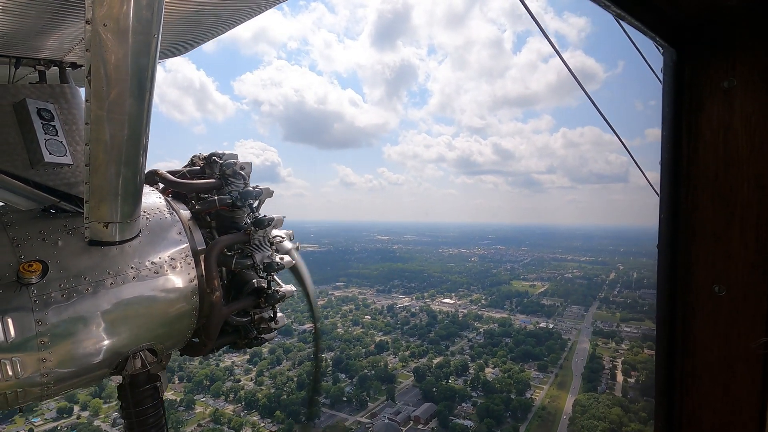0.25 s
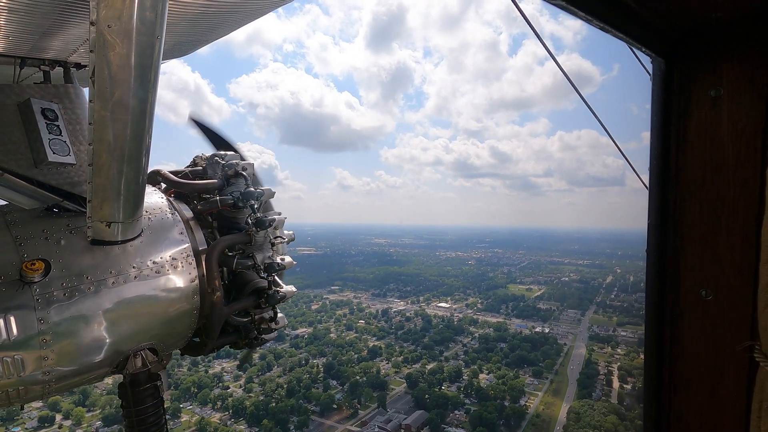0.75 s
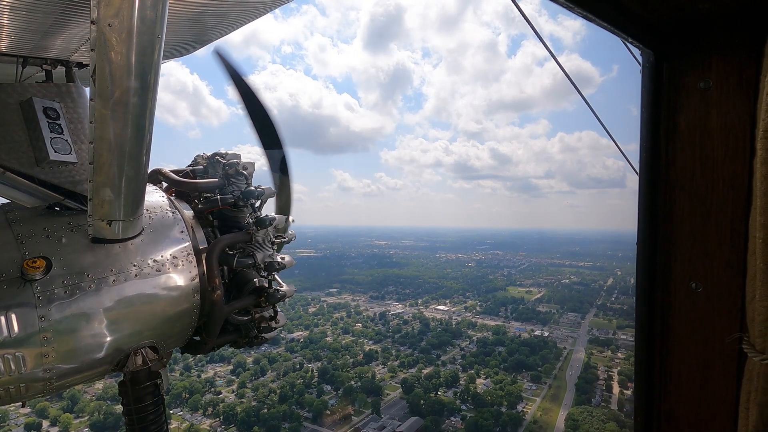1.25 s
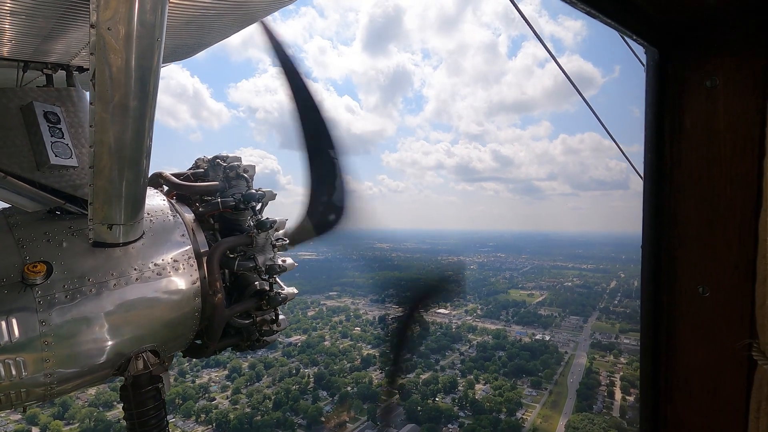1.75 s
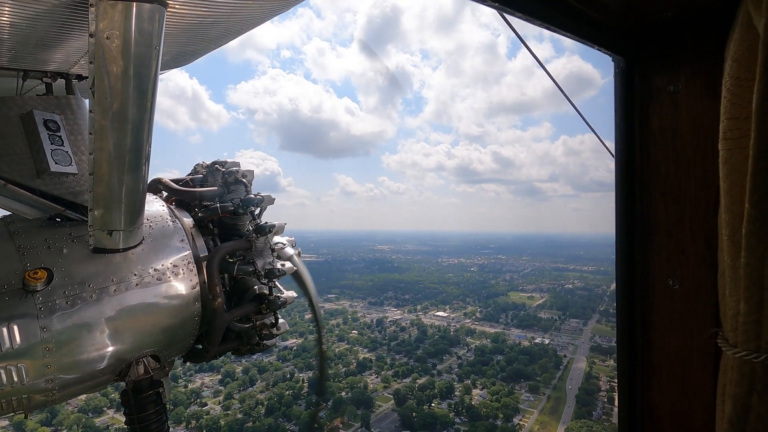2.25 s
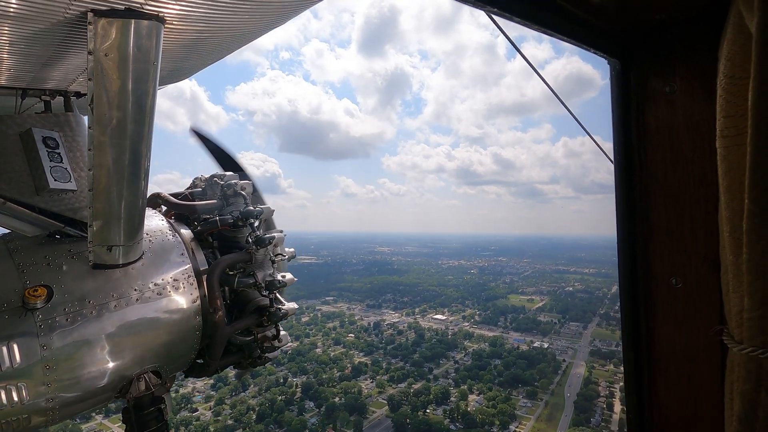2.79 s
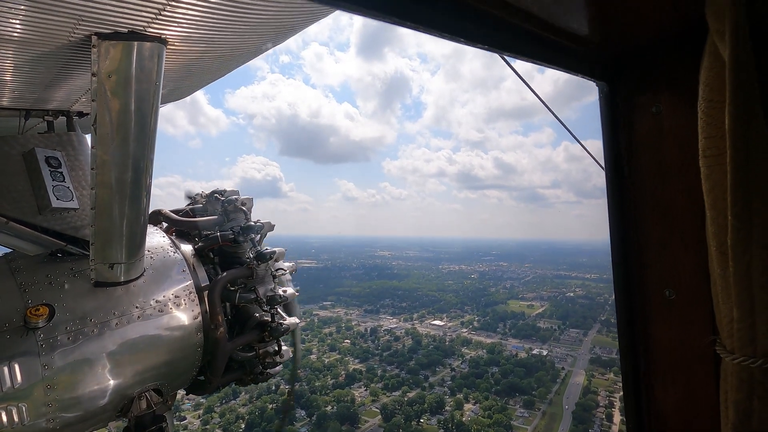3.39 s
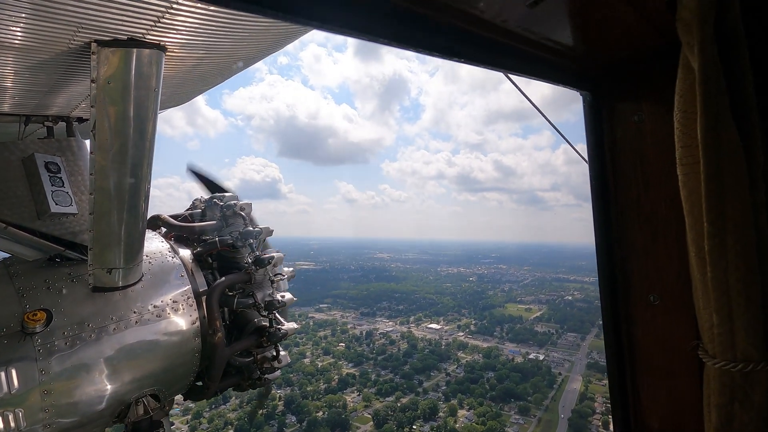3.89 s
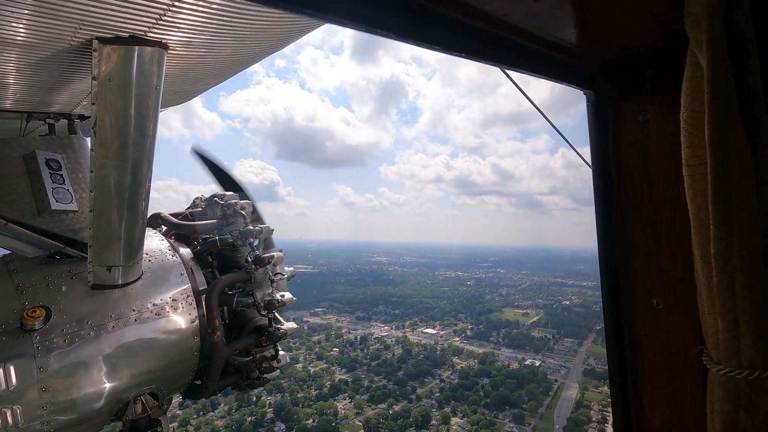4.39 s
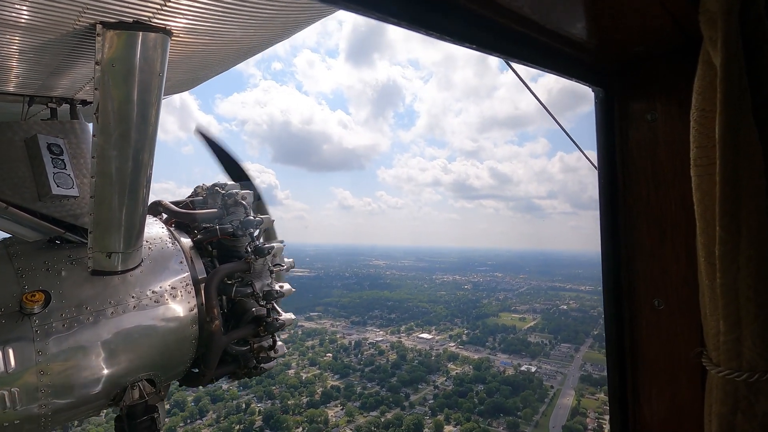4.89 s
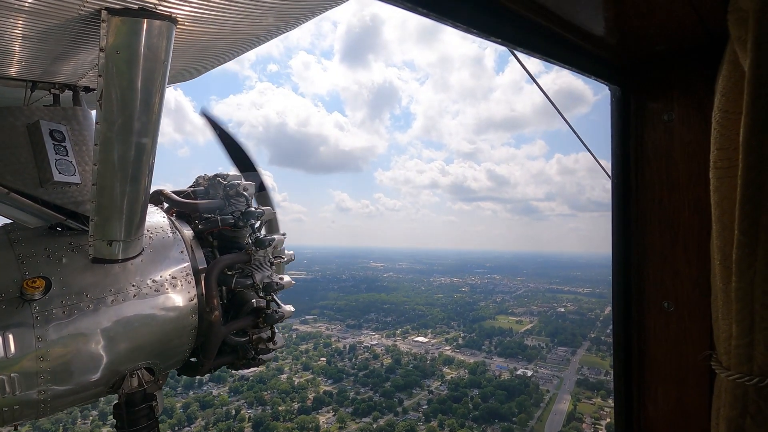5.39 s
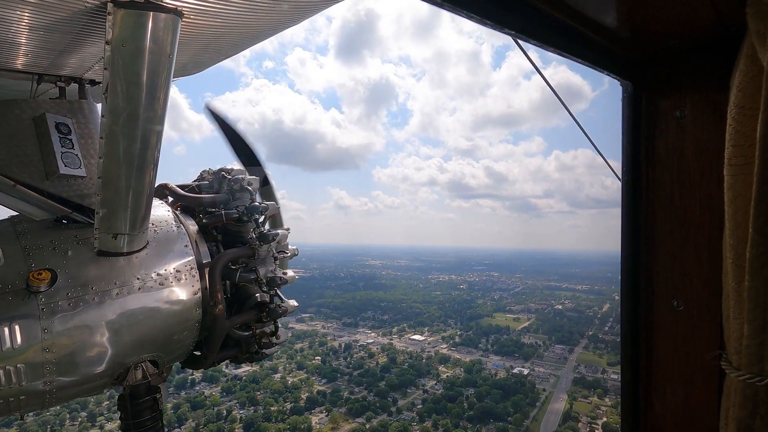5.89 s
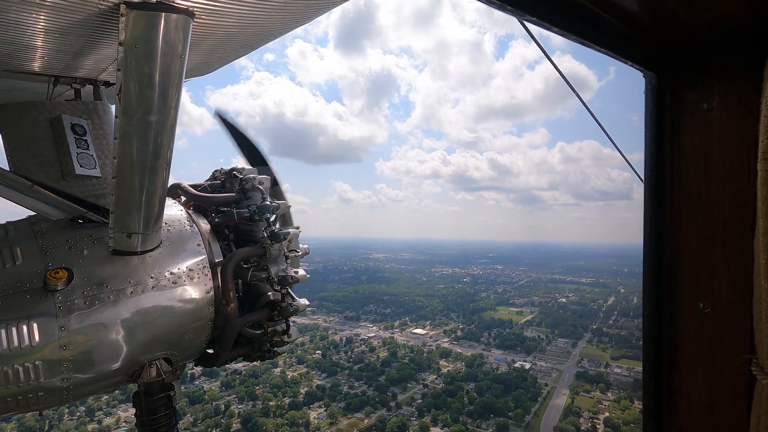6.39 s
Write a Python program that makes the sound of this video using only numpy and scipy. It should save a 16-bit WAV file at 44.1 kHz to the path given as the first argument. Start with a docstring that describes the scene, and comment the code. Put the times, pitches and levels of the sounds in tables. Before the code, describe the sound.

Loud, steady drone of several radial propeller engines heard inside an old aeroplane cabin, beating in a slow uneven throb with raspy exhaust and window hiss.

```python
"""Old three-engined aeroplane at cruise

We sit in the cabin. Three nine-cylinder radial engines with two-blade propellers turn at slightly different
speeds, so their tones (sums of sine waves) beat together in a slow, uneven throb.
Shaped noise makes the rest: firings rumble in the hull, exhaust rasps, metal clatters, air hisses past the window.
Faint gear tones sing along, gusts lift the roar, and a loose fitting buzzes now and then."""
import sys
import numpy as np
from scipy import signal
from scipy.fft import rfft, irfft, next_fast_len
from scipy.io import wavfile
from scipy.ndimage import uniform_filter1d, minimum_filter1d

SR = 44100
rng = np.random.default_rng(int(sys.argv[2]) if len(sys.argv) > 2 else 0)


def transcribe(signal):
    """Save signal, clipped to [-1, 1], as a 16-bit WAV file at the path in sys.argv[1]."""
    frames = np.atleast_2d(signal).T
    limited = np.clip(frames, -1, 1)
    pcm = np.round(limited * 32767).astype(np.int16)
    wavfile.write(sys.argv[1], SR, pcm)


N = 293265
TIME = np.arange(N) / SR  # seconds
LEFT_RIGHT = np.array([[1], [-1]])  # adds the side signal on the left, subtracts it on the right


def undb(db):
    """Turn decibels into a gain."""
    return 10 ** (np.asarray(db) / 20)


def unit(x):
    """Scale to an rms of 1."""
    return x / np.sqrt(np.mean(x ** 2))


def curve(table):
    """Draw straight lines through a (time, level) table, sample by sample."""
    s, db = np.transpose(table)
    return np.interp(TIME, s, db)


def gain_at(hz, spectrum):
    """Read the gain of a (frequency, level) table at the given frequencies."""
    f, db = np.transpose(spectrum)
    return undb(np.interp(np.log(hz + 1e-9), np.log(f), db))


def frequency_grid():
    """Give a fast transform size and the frequencies it holds."""
    size = next_fast_len(N, real=True)
    return size, np.arange(size // 2 + 1) * SR / size


def colour(x, spectrum):
    """Filter a sound by a (frequency, level) table, without delay."""
    size, hz = frequency_grid()
    return irfft(rfft(x, size) * gain_at(hz, spectrum), size)[..., :N]


def walk(rate):
    """Wander smoothly at random, with a spread near 1 and `rate` new targets a second."""
    k = int(SR / rate)
    steps = rng.standard_normal(1024)
    held = steps[np.arange(N) // k % len(steps)]
    return uniform_filter1d(held, k) * np.sqrt(3 / 2)  # smoothing joins the steps with straight lines


def bursts(cycles, sharp):
    """Swell smoothly once a cycle, with an rms of 1."""
    return unit(np.exp(sharp * np.cos(2 * np.pi * cycles)))


# How different the two ears are: side signal against middle signal. Columns: f/Hz, level/dB
WIDTH = [(60, -37), (130, -30), (260, -24.5), (500, -12), (1000, -10.5), (2000, -9.5), (4000, -11),
         (8000, -4), (11000, -12)]


def diffuse(envelope, spectrum):
    """Turbulence: shaped noise, nearly the same at both ears when low and less alike higher up."""
    mid, side = colour(rng.standard_normal((2, N)) * envelope, spectrum)
    return (mid + LEFT_RIGHT * colour(side, WIDTH)) / np.std(mid)


# One row an engine; the hunt is a slow swing in speed, the sag a slow loss of speed.
# Columns: starting shaft speed f/Hz, sag if left to settle f/Hz, hunt size f/Hz, fastest point of the hunt t/s
ENGINES = [(33.301, .622, 0, 0), (33.526, .693, .017, .4), (33.86, .808, .019, 2.8)]


def shaft_speeds(settle_s=8, hunt_period_s=2.75):
    """Each shaft eases towards a lower cruising speed; two also hunt slightly about that course."""
    settled = 1 - np.exp(-TIME / settle_s)
    speeds = []
    for hz, sag_hz, hunt_hz, s in ENGINES:
        hunt = hunt_hz * np.cos(2 * np.pi * (TIME - s) / hunt_period_s)
        speeds.append(hz - sag_hz * settled + hunt)
    return speeds


# Each engine's way into the cabin, through a panel that resonates.
# Columns: head start/turns, panel resonance f/Hz, resonance width f/Hz
PATHS = [(0, 213, 72.5), (.039, 198, 15), (.77, 164, 25)]
# The tones of the engines. Even multiples are blade passes, 4.5 is the firing rate,
# other halves come from unequal cylinders.
# Columns: multiple of shaft speed, first engine level/dB, second engine level/dB, third engine level/dB
PARTIALS = [ (1, -39, -58.5, -34), (1.5, -47, -47.5, -47), (2, -21.5, -25, -26), (2.5, -42.5, -48.5, -41.5),
            (3, -44.5, -44.5, -49), (3.5, -27.5, -43.5, -49), (4, -15, -19.5, -43.5), (4.5, -26, -48, -25),
            (5, -51.5, -33, -52.5), (5.5, -44, -45.5, -31.5), (6, -20.5, -23, -41.5),
            (6.5, -51, -38, -38.5), (7, -35, -50.5, -43.5), (7.5, -35.5, -39.5, -44.5),
            (8, -25, -21, -32.5), (8.5, -37.5, -57, -41), (9, -52.5, -41.5, -36.5), (9.5, -49.5, -44, -41),
            (10, -41.5, -33, -40.5), (10.5, -37, -37, -44), (11, -58, -43, -47), (11.5, -35, -57, -46),
            (12, -34, -35, -55.5), (12.5, -58.5, -55, -50.5), (14, -57, -37, -49.5),
            (14.5, -54, -52.5, -42.5), (16, -39, -46.5, -56.5), (18, -49.5, -45.5, -59),
            (20, -40, -57.5, -59.5), (22, -48.5, -44, -57.5), (24, -50.5, -47, -57.5),
            (28, -49, -51.5, -54.5), (30, -50, -50.5, -60.5)]


def drone(speeds, turns, blade_waver=0.12, firing_waver=0.31, waver_hz=7):
    """Three like engines sound the same partials; each panel delays what lies above its resonance."""
    out = np.zeros((2, N))
    starts = rng.uniform(0, 2 * np.pi, 64)
    for order, *levels in PARTIALS:
        # unequal cylinders swing the shaft speed: half orders sit a quarter cycle from the nearest blade partial
        start = starts[round(order)] + np.pi * (order % 1)
        wave = 0
        for speed, turn, db, (_, panel_hz, width) in zip(speeds, turns, levels, PATHS):
            hz = order * speed.mean()
            lag = 2 * np.arctan2(hz * width, panel_hz ** 2 - hz ** 2)
            angle = (2 * np.pi * (order * turn % 1) + start - lag).astype(np.float32)
            wave = wave + float(undb(db)) * (np.cos(angle) + 1j * np.sin(angle))
        # combustion varies by a set amount; high blade partials waver more than low ones
        depth = blade_waver * np.sqrt(order / 10) if order % 2 == 0 else firing_waver
        wave = wave * (1 + depth * (walk(waver_hz) + 1j * walk(waver_hz)))
        turned = wave * np.exp(2j * np.pi * rng.random())  # a random phase for the side signal
        out += wave.real + LEFT_RIGHT * gain_at(hz, WIDTH) * turned.real
    return np.sqrt(2) * out


def ring(turns, level_db, waver=0.05, waver_hz=22):
    """A clear tone at 26 times the first shaft's speed, probably an accessory gear."""
    wobble = 1 + waver * (walk(waver_hz) + 1j * walk(waver_hz))
    tone = wobble * np.exp(2j * np.pi * 26 * turns[0])
    return np.sqrt(2) * undb(level_db) * (tone.real + LEFT_RIGHT * undb(-17) * tone.imag)


def whine(hz=4830, peak_db=-59, smear_cycles=0.16):
    """A faint gear tone, smeared by a random phase of its own at each ear."""
    ears = [np.sin(2 * np.pi * (hz * TIME + smear_cycles * walk(140))) for _ in range(2)]
    return undb(peak_db) * np.array(ears)


# Tone colour of the hull's rumble. Columns: f/Hz, level/dB (per Hz, relative)
HULL = [(15, -27), (28, -8), (48, 1), (90, -8), (150, -2.5), (260, 1), (350, -1), (430, -1.5), (500, -3.5),
        (620, -9), (1000, -13), (2000, -66)]


def rumble(turns, db=-27, sharp=1.0):
    """The chance part of each firing shakes the hull: nine firings in every two turns."""
    firing_power = sum(bursts(turn * 9 / 2, sharp) ** 2 for turn in turns)
    return undb(db) * diffuse(np.sqrt(firing_power), HULL)


# Tone colour of the exhaust. Columns: f/Hz, level/dB (per Hz, relative)
EXHAUST = [(300, -20.5), (600, -7.5), (780, -6), (980, -6), (1200, 1.5), (1340, -1), (1480, -9.5),
           (1750, -13.5), (2600, -26.5), (6000, -58.5)]
# Course of the rasp before its trim and the gusts; the ring follows it too. Columns: t/s, level/dB
RASP_LEVEL = [(0, -28), (1.2, -30.5), (1.75, -29.5), (2.25, -32), (3.3, -32), (4.8, -33.5), (6.65, -30.5)]


def rasp(turns, level_db, trim_db=1.54, blade_sharp=0.12, pair_sharp=0.14, flicker_db=0.17):
    """Exhaust gas, chopped two and four times a turn by the wash of the nearest propeller."""
    chop = bursts(2 * turns[0], blade_sharp) * bursts(4 * turns[0], pair_sharp)
    flicker = undb(flicker_db * walk(25))
    return undb(level_db + trim_db) * diffuse(chop * flicker, EXHAUST)


# Tone colour of the clatter. Columns: f/Hz, level/dB (per Hz, relative)
CLATTER = [(900, -25), (1500, 1), (1800, -8.5), (1980, 4.5), (2150, 0), (2320, 2), (2500, -3), (2800, -4),
           (3200, -13.5), (5000, -30.5), (9000, -59)]
# Course of the clatter before its trim and the gusts. Columns: t/s, level/dB
CLATTER_LEVEL = [(0, -38.5), (.8, -41.5), (2.2, -41), (3.1, -40), (3.7, -37.5), (4.8, -39), (6.65, -39)]


def clatter(turns, level_db, trim_db=0.5, sharp=0.19, flicker_db=0.35):
    """Valve gear and thin metal skin buzz twice a turn in step with the second engine."""
    flicker = undb(flicker_db * walk(30))
    return undb(level_db + trim_db) * diffuse(bursts(2 * turns[1], sharp) * flicker, CLATTER)


# Tone colour of the air at the window. Columns: f/Hz, level/dB (per Hz, relative)
SLIPSTREAM = [(1000, -16), (3000, 1), (3800, 3), (4500, 0.5), (5600, -1.5), (6600, -3), (7700, -5),
              (8200, -11.5), (9300, -13), (10500, -18.5), (12200, -20.5), (13500, -31), (15000, -41)]


def slipstream(turns, gust_db, db=-45.5, sharp=0.087, flutter_hz=17.0, flutter=0.095, drift_db=0.56):
    """Air hisses at the window edge, pulsing with the blades and fluttering; its colour drifts."""
    flap = bursts(flutter_hz * TIME + 0.62 * walk(3.2), flutter)
    air = diffuse(bursts(2 * turns[0], sharp) * flap, SLIPSTREAM)
    low = colour(air, [(4500, 1.5), (7000, -15.0)])
    high = air - low
    # low and high parts drift in level separately
    drifting = low * undb(drift_db * walk(7.6)) + high * undb(drift_db * walk(9))
    return undb(db + gust_db) * drifting


# Gusts swell the slipstream and press the roar against the cabin; a negative rise is a lull.
# Columns: middle t/s, half-length t/s, rise level/dB
GUSTS = [(1.42, 0.061, 0.1), (1.884, .12, 2), (2.78, .18, -0.5), (3.88, 0.17, 0.5), (4.35, 0.44, 3.5),
         (5.312, 0.2, 1.5), (6.304, 0.11, 0.5)]


def gusts():
    """Each gust is a smooth rise and fall in dB."""
    return sum(db * np.exp(-((TIME - s) / length_s) ** 2) for s, length_s, db in GUSTS)


# Brief buzzes of a loose fitting. Columns: t/s, level/dB
RATTLES = [(1.541, -28.5), (1.621, -21), (1.696, -21.5), (2.422, -22), (3.895, -24), (4.288, -28)]


def rattles(hz=1260, length_s=.004, smear_cycles=0.22):
    """A loose fitting buzzes for an instant: a short swell of a tone with a wandering phase."""
    envelope = sum(undb(db) * np.exp(-((TIME - s) / length_s) ** 2) for s, db in RATTLES)
    return np.sqrt(2) * envelope * np.sin(2 * np.pi * (hz * TIME + smear_cycles * walk(400)))


def reflections(x, db=-13.0, count=8):
    """Window frame and walls return the roar within 1 to 12.5 ms and ripple its spectrum."""
    lags = rng.integers(SR // 1000, SR // 80, count)
    signs = rng.choice([-1, 1], count)
    echoes = sum(sign * np.roll(x, lag, axis=-1) for sign, lag in zip(signs, lags)) / np.sqrt(count)
    return (x + undb(db) * echoes) / np.sqrt(1 + undb(db) ** 2)


# How much louder the left ear is than the right. Columns: f/Hz, level/dB
LEAN = [(60, -0.5), (260, 1.24), (600, 1.5), (1200, 4), (2200, 3), (4000, 3.5), (5800, 1.4), (7500, 5),
        (8700, 9.5), (10500, 0), (14000, 2.5)]
# How far the left ear leads the right; negative means it lags. Columns: f/Hz, phase/radians
LEAD = [(0, 0.04), (860, -0.52), (1720, -0.6), (2760, -0.77)]


def microphones(x):
    """Two microphones hear the cabin with level and phase differences that depend on pitch."""
    size, hz = frequency_grid()
    f, radians = np.transpose(LEAD)
    ratio = np.log(gain_at(hz, LEAN)) + 1j * np.interp(hz, f, radians)
    # each side takes half of the difference
    return irfft(rfft(x, size) * np.exp(LEFT_RIGHT * ratio / 2), size)[:, :N]


def scene():
    """The shafts drive most sources, and gusts lift the roar; the treble leans to the left."""
    speeds, gust_db = shaft_speeds(), gusts()
    turns = [np.cumsum(speed) / SR + path[0] for speed, path in zip(speeds, PATHS)]
    exhaust_db = curve(RASP_LEVEL)
    # the ring starts 3.5 dB below the rasp's course and sinks 0.12 dB a second further
    ring_db = exhaust_db - 3.5 - 0.12 * TIME
    tones = drone(speeds, turns) + ring(turns, ring_db) + whine()
    # rasp and clatter rise by only part of each gust
    roar = rasp(turns, exhaust_db + 0.61 * gust_db)
    roar = roar + clatter(turns, curve(CLATTER_LEVEL) + 0.67 * gust_db)
    roar = roar + slipstream(turns, gust_db) + rattles()
    return microphones(tones + rumble(turns) + reflections(roar))


def record(dry, drive_db=-0.28, ceiling_db=-2.0, top_hz=15100):
    """A limiter holds the peaks down, the ends fade over 4 ms, and a steep filter cuts the top."""
    x = dry * undb(drive_db)
    hold = SR // 14  # samples
    loudest = np.abs(x).max(axis=0)
    peak = -minimum_filter1d(-loudest, hold)  # the largest value nearby
    gain = uniform_filter1d(np.minimum(1, undb(ceiling_db) / peak), hold)
    fade = np.clip(np.minimum(TIME, TIME[-1] - TIME) / .004, 0, 1)
    top_cut = signal.ellip(8, .2, 70, top_hz, fs=SR, output="sos")
    return signal.sosfilt(top_cut, x * gain * fade)


dry = scene()
out = record(dry)
transcribe(out)
```